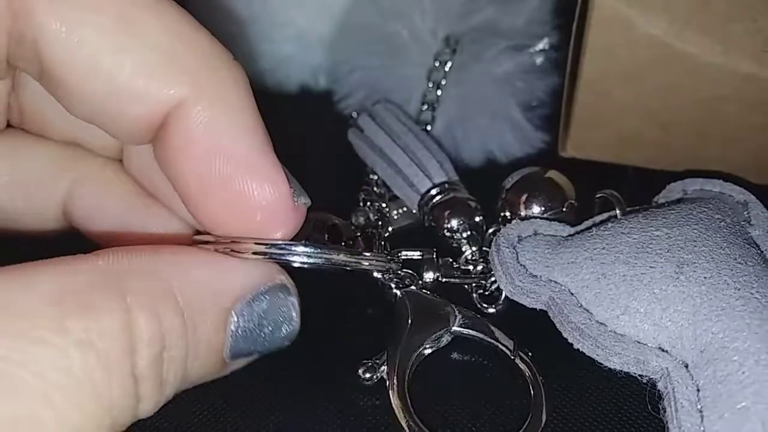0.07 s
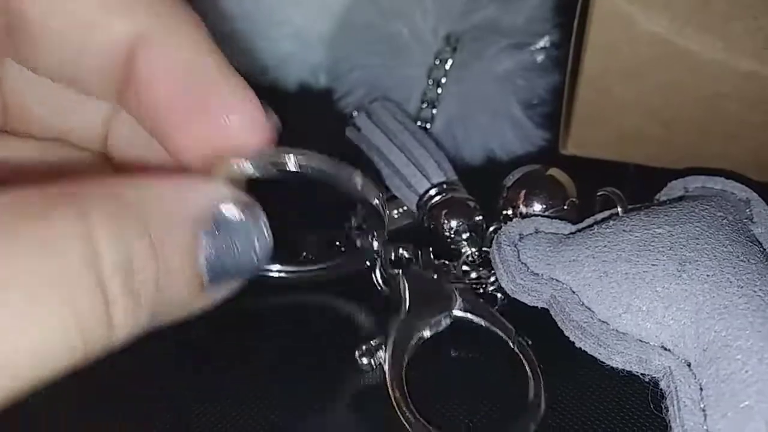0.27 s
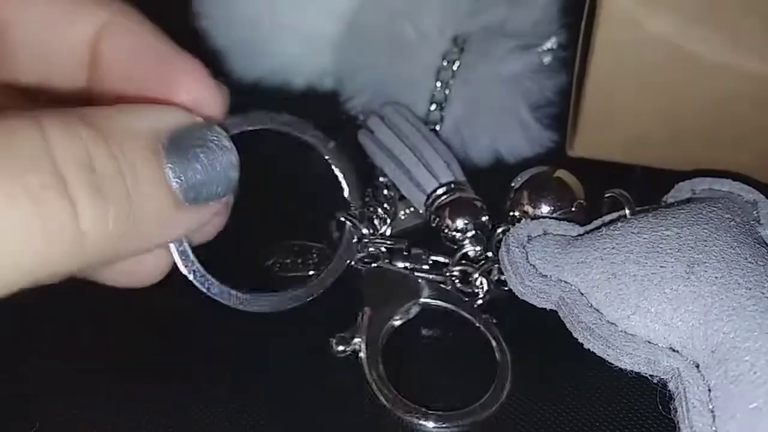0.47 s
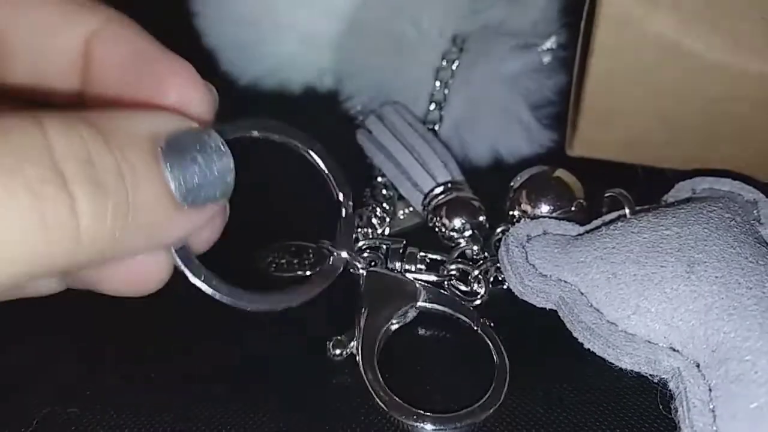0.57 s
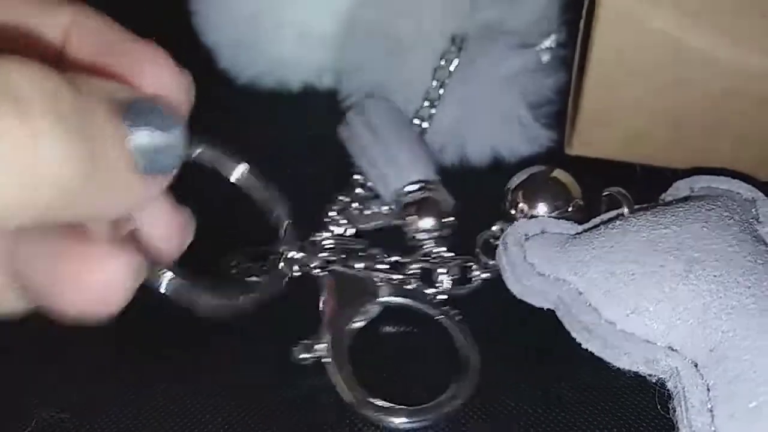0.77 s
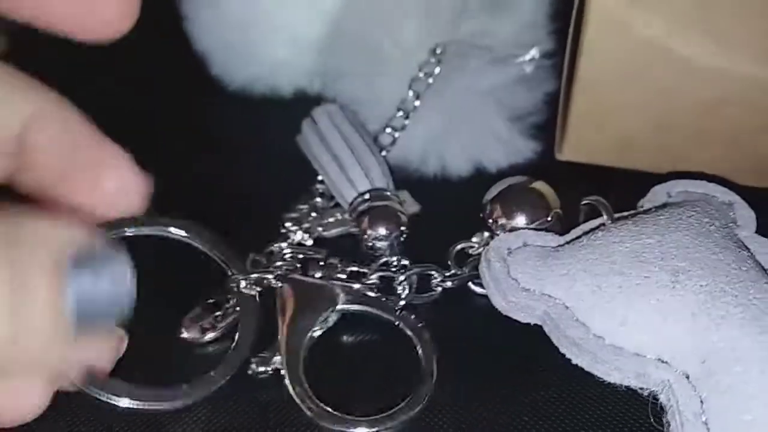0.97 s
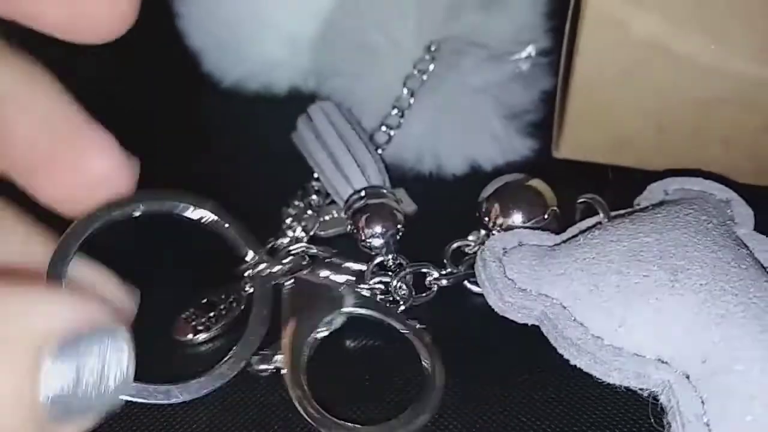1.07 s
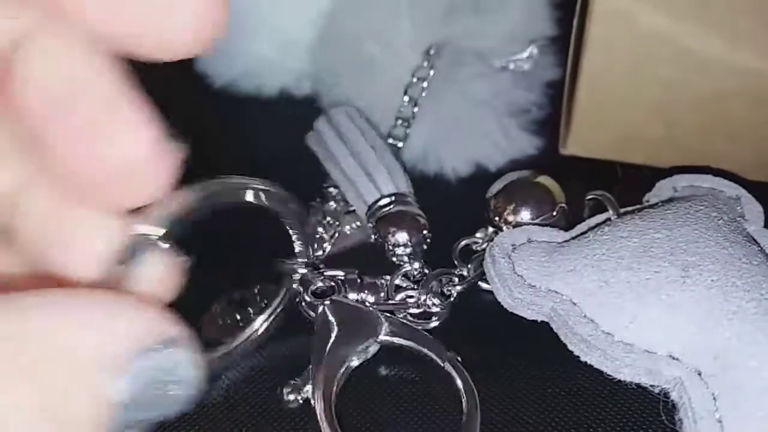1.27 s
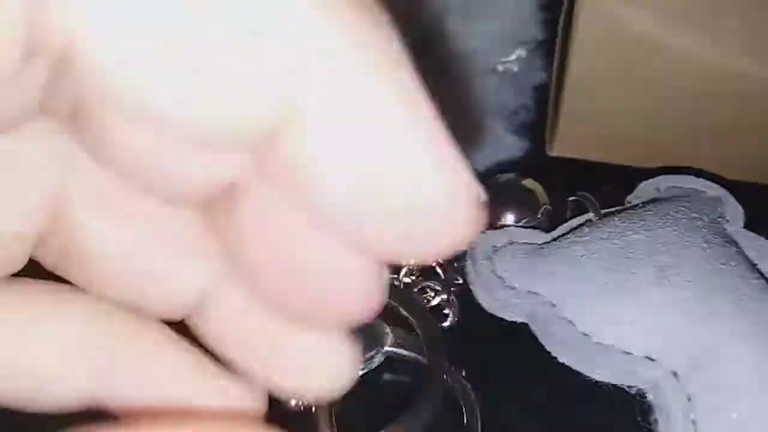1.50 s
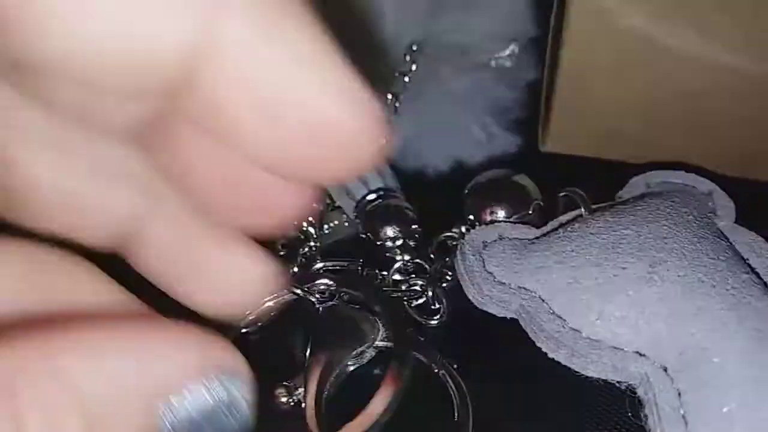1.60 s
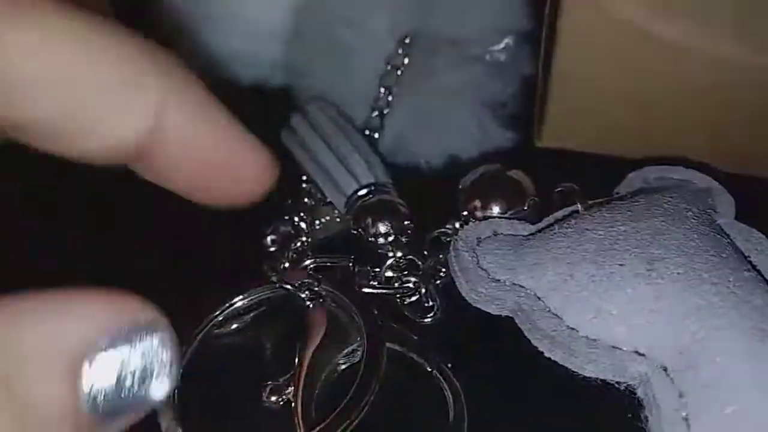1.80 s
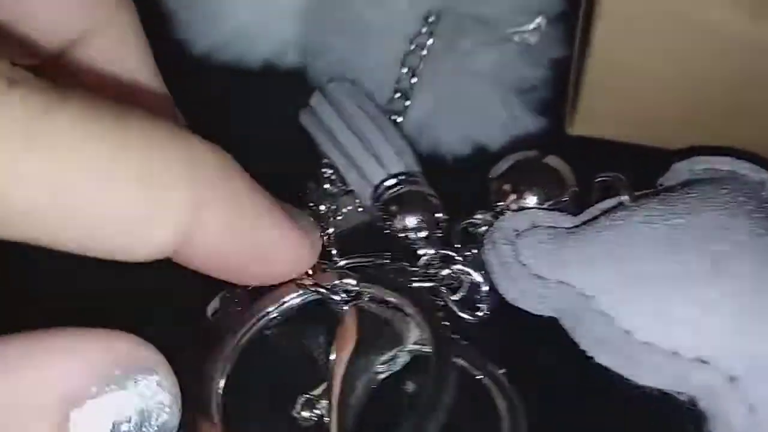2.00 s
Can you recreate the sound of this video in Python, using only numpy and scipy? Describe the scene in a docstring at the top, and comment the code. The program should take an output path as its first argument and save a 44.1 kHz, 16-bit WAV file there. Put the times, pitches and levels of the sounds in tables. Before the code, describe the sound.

Close, dry keychain clinking: irregular small ticks and chain rattles, a few harder knocks, one loud clatter on a covered table, then near quiet and a soft scrape, over faint hum and thin high buzzing whine.

```python
"""Throughout lie room tone, a low hum and a thin whine, a tone keyed on and off. Fingers turn a key ring on a
cloth-covered table: ring, clasp and charms click as damped, filtered impulses, and the chain rattles as random trains
of link slips. The bunch is let go and clatters down in noisy cracks and damped low modes, with a low overload thump.
A hand brushes the cloth as shaped noise; a last nudge slides the ring, clicks and thuds softly. Only faint high modes
of the damped metal ring on, and a small room answers with decaying noise."""
import sys
import numpy as np
from scipy import signal
from scipy.fft import rfft, irfft, next_fast_len
from scipy.io import wavfile
from scipy.ndimage import uniform_filter1d

SR = 44100
rng = np.random.default_rng(int(sys.argv[2]) if len(sys.argv) > 2 else 0)


def output_pcm(signal):
    """Save a mono or channel-first signal as 16-bit PCM at the path in sys.argv[1].

    Samples are clipped to [-1, 1] before scaling.
    """
    pcm = np.clip(np.atleast_2d(signal).T, -1, 1) * 32767
    wavfile.write(sys.argv[1], SR, np.round(pcm).astype(np.int16))


N = 90404  # length in samples


def amp(db):
    """Level to amplitude ratio: 20 dB per factor of ten."""
    return 10 ** (np.asarray(db) / 20)


def unit(x):
    """Normalization to a root-mean-square value of 1."""
    return x / np.sqrt(np.mean(x ** 2) + 1e-20)


def along(points, hz):
    """Linear interpolation of (f/Hz, value) points on a logarithmic frequency axis."""
    f, value = np.transpose(points)
    return np.interp(np.log(hz + 1), np.log(f + 1), value)


def filtered(x, response):
    """Linear filtering: the spectrum of x is multiplied by a frequency response."""
    size = next_fast_len(N + SR // 2)
    hz = np.fft.rfftfreq(size, 1 / SR)
    return irfft(rfft(x, size) * response(hz), size)[:N]


def causal(colour_db, size=1024):
    """Minimum phase: the folded cepstrum gives the sharpest impulse response of a given colour."""
    hz = np.fft.rfftfreq(size, 1 / SR)
    cepstrum = irfft(np.log(amp(colour_db(hz))))
    cepstrum[1:size // 2] *= 2
    cepstrum[size // 2 + 1:] = 0
    return irfft(np.exp(rfft(cepstrum)))


def add(track, s, sound):
    """Superposition: a sound is summed into the track from time s."""
    part = track[max(round(s * SR), 0):][:len(sound)]
    part += sound[:len(part)]


def taps(rate, spread_db, size):
    """Random impulse process: tiny impacts of either sign and uneven strength, on average rate a second."""
    chance, strength = rng.random(size), rng.standard_normal(size)
    sign = rng.choice([-1, 1], size)
    return (chance < rate / SR) * sign * amp(spread_db * np.clip(strength, -2, 2))


CHATTER_PER_S, CHATTER_T60_S = 1800, 0.027


def rebounds(db, size):
    """Repeated impact: one blow, then a dying flurry of tiny ones whose total energy is set by db."""
    t = np.arange(size) / SR
    force = taps(CHATTER_PER_S, 2.34, size=size) * amp(-60 * t / CHATTER_T60_S) * (t > .0005)
    force *= amp(db) / (np.linalg.norm(force) + 1e-9)
    force[0] = 1
    return force


BUILD_S = .0008  # mean delay as a click spreads through the bunch


def dispersed(click):
    """Dispersion: each frequency has its own smoothly varying random delay, which rounds the attack."""
    spectrum = rfft(click)
    knots = rng.uniform(0, 2 * BUILD_S, size=24)
    delay = np.interp(np.linspace(0, 1, len(spectrum)), np.linspace(0, 1, len(knots)), knots)
    # phase is the delay summed over frequency
    return irfft(spectrum * np.exp(-2j * np.pi * np.cumsum(delay) * SR / len(click)))


def resonance(hz, centre_hz, width_hz):
    """Resonance curve: a bell of height 1, down to one half at width_hz from its centre."""
    return 1 / (1 + ((hz - centre_hz) / width_hz) ** 2)


# share of a treble change that applies at each frequency: f/Hz, share
TREBLE_SHARE = [(3000, 0.052), (6000, 0.4), (12000, 0.85)]
UNEVEN_DB = 6  # largest peak or dip before the treble share


def uneven(hz):
    """Position-dependent excitation: every touch lands on another spot and has other treble peaks and dips (dB)."""
    knots = 2 * rng.random(size=28) - 1
    ripple = np.interp(hz, np.linspace(0, SR / 2, len(knots)), knots)
    return UNEVEN_DB * ripple * along(TREBLE_SHARE, hz)


CLICK_S = .003


def sized(click):
    """Energy normalization: a click gets the energy of CLICK_S seconds at rms 1."""
    return click * np.sqrt(CLICK_S * SR) / np.linalg.norm(click)


# spectrum of the room tone: f/Hz, level/dB
AIR_COLOUR = [(20, -32), (45, -17.5), (70, 1), (105, -3), (170, -7.5), (500, -5), (900, -13), (2000, -14),
              (4500, -20), (10000, -23.5), (15500, -22)]
AIR_DB, HUM_HZ, HUM_DB = -57, 237.8, -68.5  # rms levels


def background():
    """Stationary noise with a given spectrum, plus a pure tone as the hum."""
    t = np.arange(N) / SR
    air = unit(filtered(rng.standard_normal(N), lambda hz: amp(along(AIR_COLOUR, hz))))
    hum = np.sqrt(2) * np.sin(2 * np.pi * HUM_HZ * t)
    return amp(AIR_DB) * air + amp(HUM_DB) * hum


WHINE_HZ, WHINE_WANDER_HZ = 8268, 71.5  # mean pitch, rms wander
WHINE_DB, WHINE_TICK_DB = -52.5, -44
PULSE_RATE, PULSE_START_S, PULSE_ON_S = 60, .0031, .0126  # pulses per second, offset, time on


def whine():
    """Amplitude keying: a frequency-modulated tone switches on and off, with a tick at each start."""
    t = np.arange(N) / SR
    on = ((t - PULSE_START_S) * PULSE_RATE % 1 < PULSE_ON_S * PULSE_RATE) * 1.
    wander = unit(uniform_filter1d(rng.standard_normal(N), size=50))
    pitch = WHINE_HZ + WHINE_WANDER_HZ * wander
    tone = uniform_filter1d(on, size=30) * np.sin(2 * np.pi * np.cumsum(pitch) / SR)
    tick_colour = [(3000, -3), (9000, 10), (12000, 5), (15500, -6)]  # f/Hz, level/dB
    starts = np.diff(on, prepend=0) > 0
    clicks = filtered(starts, lambda hz: amp(along(tick_colour, hz)))
    return amp(WHINE_DB) * tone + amp(WHINE_TICK_DB) * clicks


# one stroke of the hand over the cloth: t/s at the height, half length/s, level/dB
HAND_STROKE = (1.75, 0.24, -56)
# spectrum of the rubbing: f/Hz, level/dB
CLOTH_COLOUR = [(80, -51), (240, 8.5), (320, -10), (1400, -20), (2000, 5.5), (2400, -8), (3700, -4.5),
                (5000, -32)]


def brush():
    """Friction noise: a faint rub is filtered noise under a bell-shaped swell."""
    s, half, db = HAND_STROKE
    swell = np.exp(-((np.arange(N) / SR - s) / half) ** 2)
    rub = unit(filtered(rng.standard_normal(N), lambda hz: amp(along(CLOTH_COLOUR, hz))))
    return amp(db) * swell * rub


# short low thumps, the recorder's overload thump under the loudest blow and a soft thud at the last nudge:
# t/s, final f/Hz, level/dB before onset and doubling, t60/s
THUMPS = [(1.473, 69, -34, 0.016), (1.9828, 296, -23, 0.012)]
THUMP_RISE_S, THUMP_SAG, THUMP_SAG_S = 0.0017, 0.54, 0.0018  # onset, initial excess of pitch (share), its decay


def thumps():
    """Heavily damped oscillation: each thump is a short decaying sinusoid, falling in pitch."""
    out, t = np.zeros(N), np.arange(SR // 8) / SR
    onset = 1 - np.exp(-t / THUMP_RISE_S)
    for s, hz, db, t60 in THUMPS:
        pitch = hz * (1 + THUMP_SAG * np.exp(-t / THUMP_SAG_S))
        phase = 2 * np.pi * np.cumsum(pitch) / SR
        add(out, s, -amp(db - 60 * t / t60) * onset * 2 * np.sin(phase))
    return out


# the ring slides over the clasp under a finger: t/s, level/dB
SLIDE_LEVEL = [(1.876, -70), (1.893, -43.5), (1.904, -33), (1.925, -41.5), (1.945, -41), (1.975, -41.5),
               (2.003, -68), (2.03, -93)]
# spectrum of one slip: f/Hz, level/dB
SLIP_COLOUR = [(100, -54), (400, -4.5), (600, 5), (900, -4.5), (1250, 3.5), (2600, -3), (4000, -3.5),
               (7000, -21), (10000, -24), (15500, -29)]


def slide():
    """Stick-slip friction: dense little slips excite one impulse response as the ring is pushed along."""
    level_db = np.interp(np.arange(N) / SR, *np.transpose(SLIDE_LEVEL), left=-120)
    slip = causal(lambda hz: along(SLIP_COLOUR, hz))
    slips = amp(level_db) * unit(taps(3000, 5.2, size=N))
    return signal.fftconvolve(slips, slip / np.linalg.norm(slip))[:N]


# the chain shifts and rattles: t/s at the height, half length/s, level/dB, central f/Hz of the link pitches
CHAIN_SHIFTS = [(.197, 0.035, -39, 2600), (0.3, 0.14, -51, 2700), (0.39, 0.06, -42, 2800),
                (0.721, 0.05, -36, 2290), (0.861, 0.054, -36.5, 2440), (1.06, 0.057, -46, 2320),
                (1.164, 0.041, -40.5, 1690), (1.226, 0.061, -37, 2620), (1.398, 0.055, -36.5, 2530),
                (1.495, .028, -30.5, 1970), (1.607, 0.055, -46.5, 2000)]
# spectrum common to the links: f/Hz, level/dB
LINK_COLOUR = [(40, -49), (330, -14), (560, -2.5), (750, -2.5), (890, -7.5), (1150, -1), (1800, -1.5),
               (2550, -3.5), (3300, -4), (4500, -11.5), (6500, -17.5), (9600, -26.5), (12000, -23),
               (15500, -42)]
LINKS_PER_S, LINK_SPREAD_DB = 1500, 3.5  # slips of all links together, spread of their strength
LINK_PEAK_DB, LINK_WIDTH_HZ, LINK_PITCH_SPREAD = 10, 190, .15  # spread in natural-log units


def chain(count=6):
    """Random excitation of resonators: in each swell links slip and tumble, each ringing at its own pitch."""
    out = np.zeros(N)
    t = np.arange(-SR // 7, SR // 7) / SR
    for s, half, db, ring_hz in CHAIN_SHIFTS:
        swell = amp(db) * np.exp(-(t / half) ** 2)
        for link_hz in ring_hz * np.exp(LINK_PITCH_SPREAD * rng.standard_normal(count)):
            def colour(hz):
                peak = LINK_PEAK_DB * resonance(hz, link_hz, LINK_WIDTH_HZ)
                return along(LINK_COLOUR, hz) + uneven(hz) + peak
            link = causal(colour)
            slips = swell * unit(taps(LINKS_PER_S / count, LINK_SPREAD_DB, size=len(t)))
            add(out, s + t[0], signal.fftconvolve(slips, dispersed(link)) / np.linalg.norm(link))
    return out / np.sqrt(count)


GRIP_DETUNE = .04  # largest shift of pitch (share)
# single links ticking: t/s, level/dB
LINK_TICKS = [(0.1663, -39.5), (.174, -38.5), (0.1905, -31), (0.1937, -29), (0.2092, -29), (0.2118, -31),
              (0.2251, -27), (0.3376, -41), (.371, -33), (0.3783, -39), (0.4525, -36), (0.6648, -38.5),
              (0.8305, -33.5)]
TICK_HZ, TICK_RISE_S = 2700, .00032  # mean pitch, time to the peak of the envelope


def ticks():
    """Impulsively excited oscillator: a small link drops against its neighbour, a ping of a few cycles."""
    out, t = np.zeros(N), np.arange(SR // 50) / SR
    for s, db in LINK_TICKS:
        hz = TICK_HZ * (1 + GRIP_DETUNE * rng.uniform(-1, 1))
        ping = t * np.exp(-t / TICK_RISE_S) * np.sin(2 * np.pi * hz * t)
        add(out, s, amp(db) * sized(ping))
    return out


# high modes of ring and clasp: mean f/Hz, relative level/dB, t60/s
METAL_MODES = [(3850, -17, .2), (5050, -13, .1), (5750, -14, .1), (6280, -17, .1), (7550, -17, .06),
               (10600, -15, .04), (11200, -8, .045), (11500, -11, .05), (11940, -12, .06),
               (12300, -6, .045), (12550, -11, .04), (14100, -14, .035)]
RING_DB, RING_SPREAD_DB, DETUNE = -16, 1.5, 0.0055  # level offset, largest level and pitch (share) deviations


def ringing(t, bright_db):
    """Modal superposition: faint decaying sinusoids, a little different at every touch."""
    mode_hz, mode_db, t60 = np.transpose(METAL_MODES)[:, :, None]
    level, tune, phase = 2 * rng.random((3, len(METAL_MODES), 1)) - 1
    decay = amp(mode_db + RING_SPREAD_DB * level - 60 * t / t60)
    cycles = mode_hz * (1 + DETUNE * tune) * t + phase
    modes = decay * np.sin(2 * np.pi * cycles)
    return amp(RING_DB + bright_db) * modes.sum(0)


# spectrum of an average contact: f/Hz, level/dB
CLICK_COLOUR = [(40, -41), (200, -13.5), (350, -17.5), (550, -6), (750, -3), (890, -18.5), (1130, -2.5),
                (1700, -0.5), (2100, -2), (2550, 4), (3300, -3.5), (4300, -7), (5900, -9), (9600, -22),
                (12000, -17), (15500, -32)]
# share of the extra weight that applies at each frequency: f/Hz, share
LOW_SHARE = [(1300, 0.75), (2100, 0)]
# metal touching metal: t/s, level/dB before CONTACT_DB, extra weight/dB and extra brightness/dB before
# their shares, f/Hz of the struck part
METAL_CONTACTS = [(0.1481, -42, 1, -27, 2570), (0.1786, -34.5, 4.5, 2.5, 2890), (0.195, -34, -9, -2, 2860),
                  (0.2221, -31.5, -4.5, 10.5, 2800), (0.2454, -30, -3.5, -5, 2800),
                  (0.2487, -35, 0, 1, 2340), (0.2612, -34, -22, -8, 2350), (0.292, -37.5, 2.5, 3, 2340),
                  (0.3162, -33, -0.5, 7, 2770), (0.3615, -33, -2, -16, 2920), (0.383, -27, -21, -10, 1940),
                  (0.3877, -29.5, -9, -8, 2190), (0.4111, -30.5, 0.5, -16, 2450),
                  (0.4154, -26.5, -1, 6, 2330), (0.431, -28.5, 0, -2.5, 2820), (0.4955, -35, -3, -8, 2390),
                  (0.5013, -37, -4, 11.5, 2600), (0.5093, -31, 7, 11.5, 2600), (0.5239, -33, -5, 8.5, 2950),
                  (0.528, -36.5, 0, -6, 2800), (0.577, -45, 4, 8, 2300), (0.609, -37.5, 3, 10, 2350),
                  (0.6298, -28.5, -2, -12, 2700), (0.7869, -34.5, 20.5, 16, 2350),
                  (0.7892, -28.5, -2, 3, 2230), (0.799, -27, -27, -1, 2330), (0.8032, -26.5, -2, 3, 2300),
                  (0.806, -32.5, 6, 8, 2280), (0.8154, -33, -7, -1, 2400), (0.846, -34, -13, 7, 2930),
                  (0.8813, -31, -7, 11, 2570), (0.8858, -32, 9.5, -14, 2560),
                  (0.9051, -35.5, 18, -18, 2350), (1.011, -45, 18, -3, 2360), (1.0396, -32.5, -3, -4, 2250),
                  (1.0745, -35, -19, 1.5, 2590), (1.0808, -38.5, -10, 9, 2450), (1.118, -37, 2, -26, 1800),
                  (1.1384, -32, 2, -33, 1710), (1.1754, -32.5, -3, 2, 2500), (1.2101, -27, 12, 7, 2500),
                  (1.2191, -22.5, 1.5, 0, 2960), (1.228, -27.5, -14, 6, 2420),
                  (1.2587, -34.5, 12, 13, 2560), (1.2796, -37, -10, 5, 2540), (1.3405, -39.5, -4, 6, 2800),
                  (1.396, -36, -23, 11, 2950), (1.4132, -34, 12, 10, 2940), (1.4328, -35, 5, 0, 1790),
                  (1.4779, -18, 4, 11, 2000), (1.491, -24, 6, 8, 1730), (1.4956, -22.5, 10.5, 18, 2370),
                  (1.5146, -27, -8, 5, 1900), (1.5446, -28.5, 9.5, 9, 1850),
                  (1.8975, -35.5, -17, 7.5, 2660), (1.904, -37, -17, 9, 2680),
                  (1.9394, -37, -10, 3.5, 2680), (1.996, -43, 11.5, 4, 2900)]
CONTACT_DB, CHATTER_DB = -3, 0.5  # common level offset, rebounds relative to the first impact
PITCH_PEAK_DB, PITCH_WIDTH_HZ = 5, 420  # resonance of the struck part


def contacts():
    """Impact excitation: a damped, pitched click with tiny rebounds sets the metal ringing faintly."""
    out, t = np.zeros(N), np.arange(SR // 6) / SR
    average = causal(lambda hz: along(CLICK_COLOUR, hz))
    scale = np.sqrt(CLICK_S * SR) / np.linalg.norm(average)
    for s, db, weight_db, bright_db, pitch_hz in METAL_CONTACTS:
        def colour(hz):
            peak = PITCH_PEAK_DB * resonance(hz, pitch_hz, PITCH_WIDTH_HZ)
            tilt = weight_db * along(LOW_SHARE, hz) + bright_db * along(TREBLE_SHARE, hz)
            return along(CLICK_COLOUR, hz) + uneven(hz) + peak + tilt
        click = dispersed(causal(colour))
        force = rebounds(CHATTER_DB, size=len(t))
        struck = scale * signal.fftconvolve(force, click)[:len(t)]
        add(out, s, amp(db + CONTACT_DB) * (struck + ringing(t, bright_db)))
    return out


# hard blows on the big ring: t/s, level/dB, crack level/dB relative to the body, most strongly struck f/Hz
RING_KNOCKS = [(0.9431, -24.5, -10.5, 4160), (0.9706, -25, -15, 1550), (1.2025, -21.5, -8.5, 1110),
               (1.382, -25.5, -6, 1800), (1.4744, -10.5, -2, 1650), (1.5321, -18.5, -8.5, 1440),
               (1.5877, -22, -7.5, 1860)]
# modes of the big ring: mean f/Hz, relative level/dB
RING_MODES = [(700, -8), (1260, -1), (1500, -4.5), (1800, -1), (2300, -4), (2780, -4), (3600, -4.5),
              (4150, -12)]
# spectrum of the crack: f/Hz, level/dB
CRACK_COLOUR = [(700, -12), (1800, 7), (5000, 2.5), (9000, -9), (13000, -3.5), (16000, -21)]
KNOCK_T60_S, CRACK_T60_S, KNOCK_CHATTER_DB = .011, 0.02, -4  # decay of modes and crack, rebound level


def knocks():
    """Modal excitation by a hard blow: a sharp crack, with low modes damped by the hand, boosted where struck."""
    out, t = np.zeros(N), np.arange(SR // 6) / SR
    mode_hz, mode_db = np.transpose(RING_MODES)[:, :, None]
    sign = (-1) ** np.arange(len(RING_MODES))[:, None]
    for s, db, crack_db, struck_hz in RING_KNOCKS:
        level, tune = 2 * rng.random((2, len(RING_MODES), 1)) - 1
        struck_db = PITCH_PEAK_DB * resonance(mode_hz, struck_hz, PITCH_WIDTH_HZ)
        decay = amp(mode_db + RING_SPREAD_DB * level + struck_db - 60 * t / KNOCK_T60_S)
        modes = sign * decay * np.cos(2 * np.pi * mode_hz * (1 + GRIP_DETUNE * tune) * t)
        force = rebounds(KNOCK_CHATTER_DB, size=len(t))
        body = signal.fftconvolve(modes.sum(0), force)[:len(t)]
        burst = rng.standard_normal(len(t)) * amp(-60 * t / CRACK_T60_S)
        crack = signal.fftconvolve(burst, causal(lambda hz: along(CRACK_COLOUR, hz)))[:len(t)]
        add(out, s, amp(db) * (sized(body) + amp(crack_db) * sized(crack) + ringing(t, crack_db)))
    return out


# reverberation time of the room: f/Hz, t60/s
TAIL_T60 = [(300, 0.84), (2000, 0.29), (6000, 0.26), (14000, 0.033)]
ROOM_DB, WALLS_DB, WALLS_T60_S = -19, -12.5, 0.098  # weak tail, quick answer and its decay


def room(x, size=512):
    """Diffuse reverberation: hand and table answer quickly and ever differently, over a frequency-dependent tail."""
    hz, t, z = signal.stft(rng.standard_normal(SR // 2), SR, nperseg=256)
    decay = amp(-60 * t / along(TAIL_T60, hz)[:, None])
    tail = signal.istft(z * decay, SR, nperseg=256)[1]
    out = amp(ROOM_DB) * signal.fftconvolve(x, tail / np.linalg.norm(tail))[:N]
    fade = amp(-60 * np.arange(SR // 7) / SR / WALLS_T60_S)
    # each short piece of sound meets a new random response
    pieces = np.pad(x, (0, -N % size)).reshape(-1, size)
    walls = rng.standard_normal((len(pieces), len(fade))) * fade / np.linalg.norm(fade)
    for k, answer in enumerate(signal.fftconvolve(pieces, walls, axes=1)):
        add(out, k * size / SR, amp(WALLS_DB) * answer)
    return np.pad(out, (SR // 300, 0))[:N]  # both arrive a 300th of a second late


def scene():
    """Superposition of direct sound, room answer and background."""
    keys = thumps() + slide() + chain() + ticks() + contacts() + knocks()
    return (background() + whine() + brush() + room(keys) + keys)[None]


LOW_CUT_HZ, TOP_HZ = 22, 15850


def record(dry):
    """Saturation and band limiting: the recorder rounds high peaks, thins deep bass and cuts above TOP_HZ."""
    rounded = dry[0] / (1 + (dry[0] / .9) ** 4) ** (1 / 4)
    low_cut = signal.butter(2, LOW_CUT_HZ, "high", fs=SR, output="sos")
    thinned = signal.sosfilt(low_cut, rounded)
    return filtered(thinned, lambda hz: 1 / (1 + (hz / TOP_HZ) ** 400))[None]


dry = scene()
out = record(dry)
output_pcm(out)
```